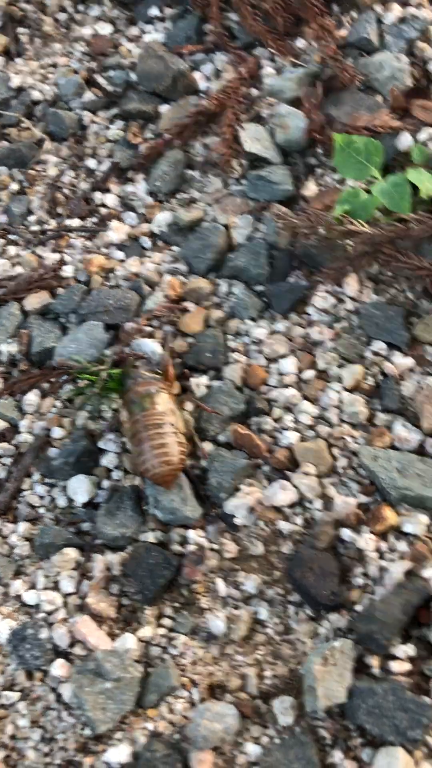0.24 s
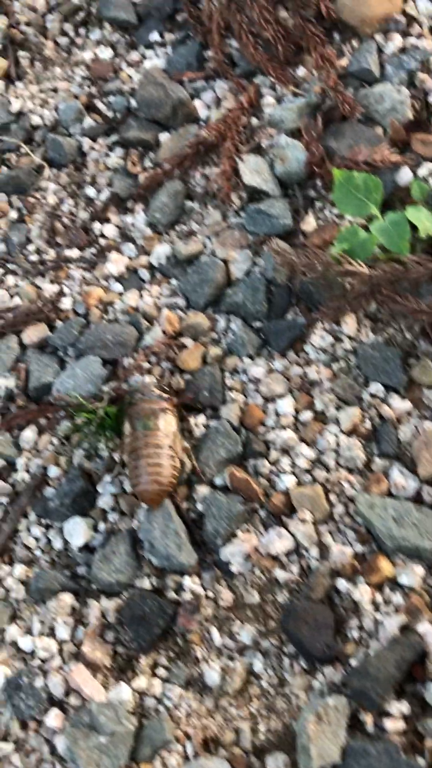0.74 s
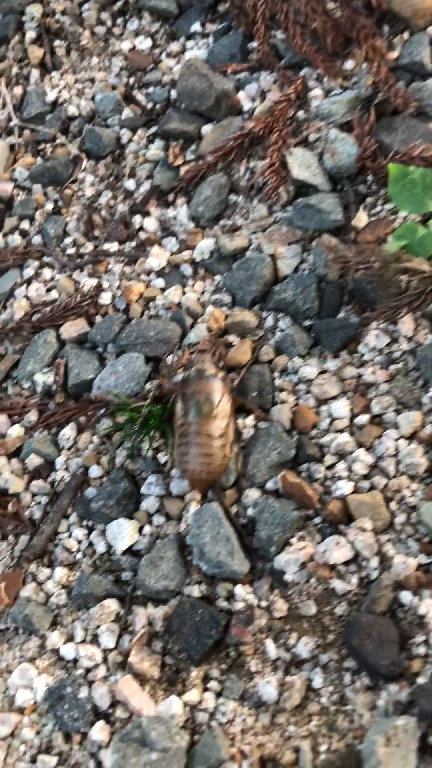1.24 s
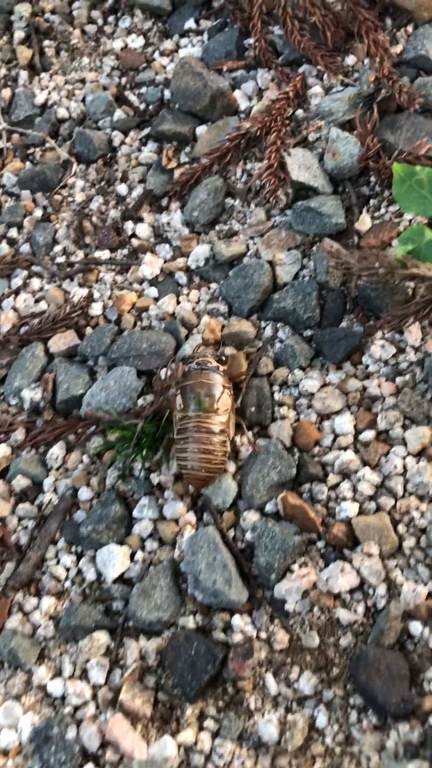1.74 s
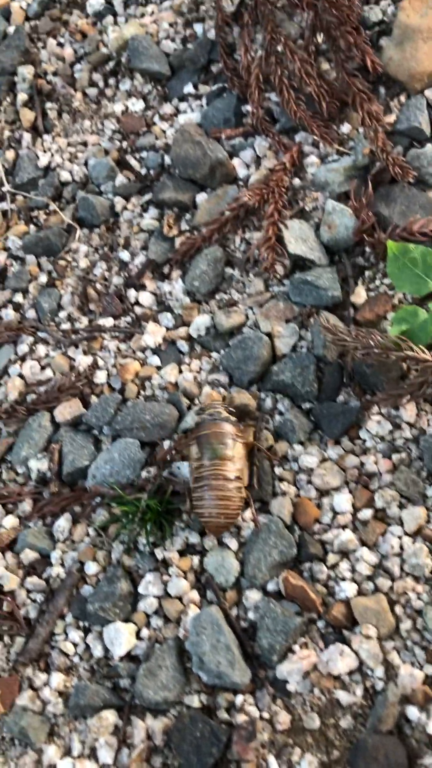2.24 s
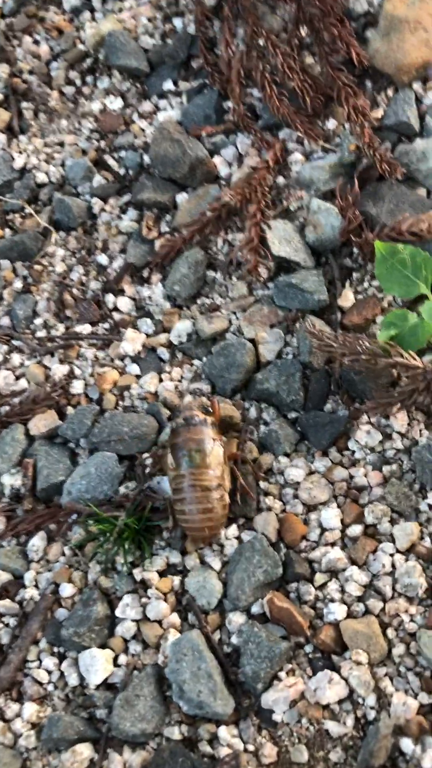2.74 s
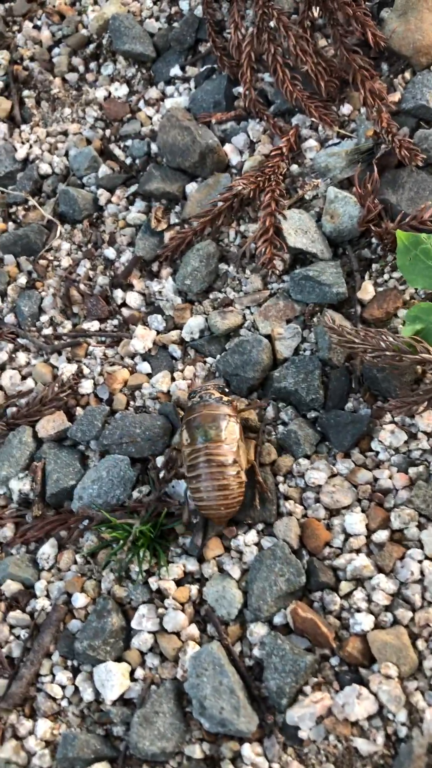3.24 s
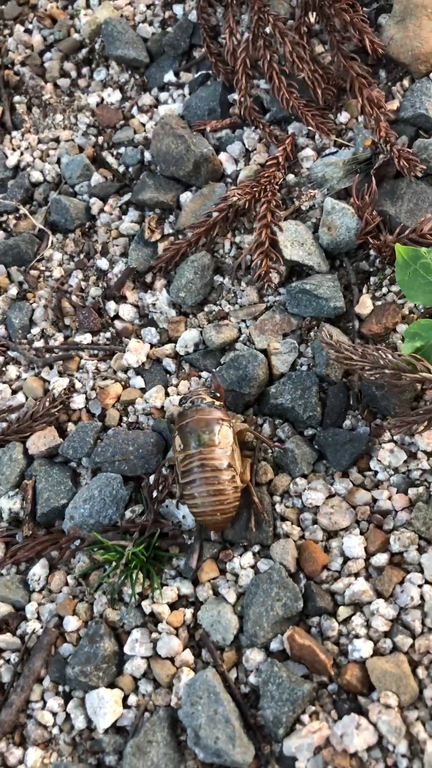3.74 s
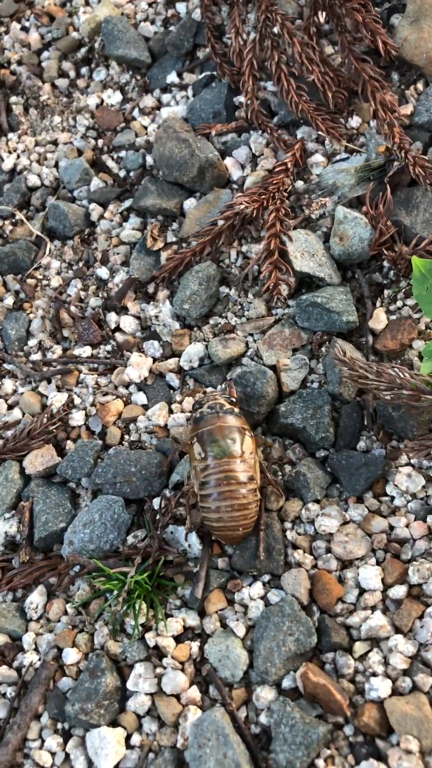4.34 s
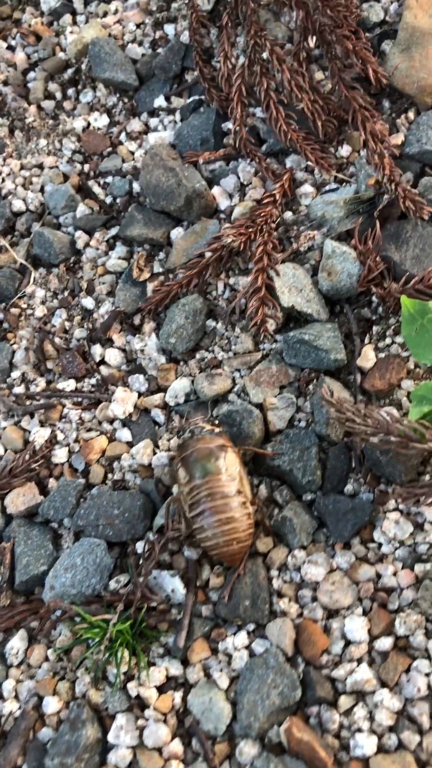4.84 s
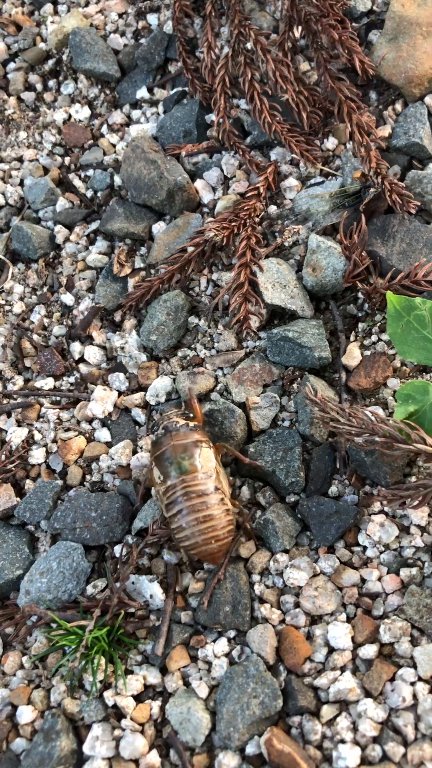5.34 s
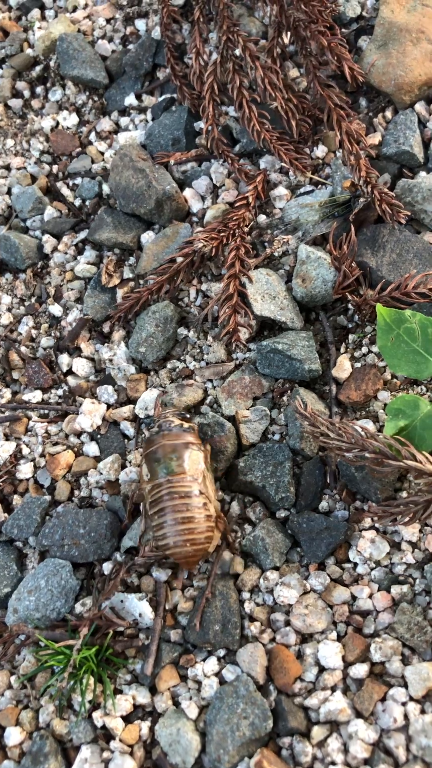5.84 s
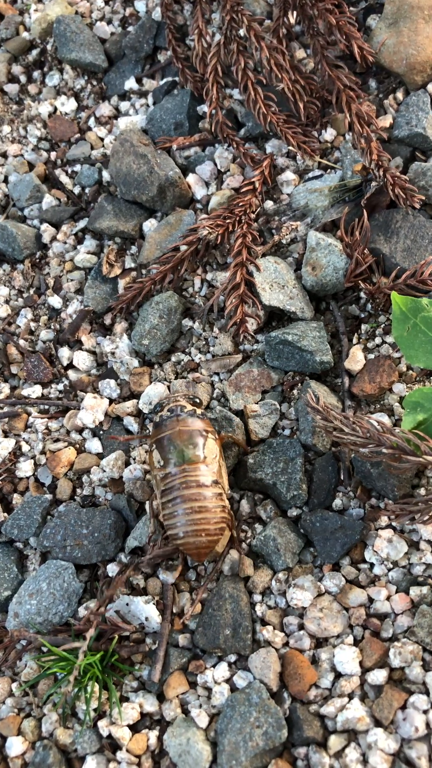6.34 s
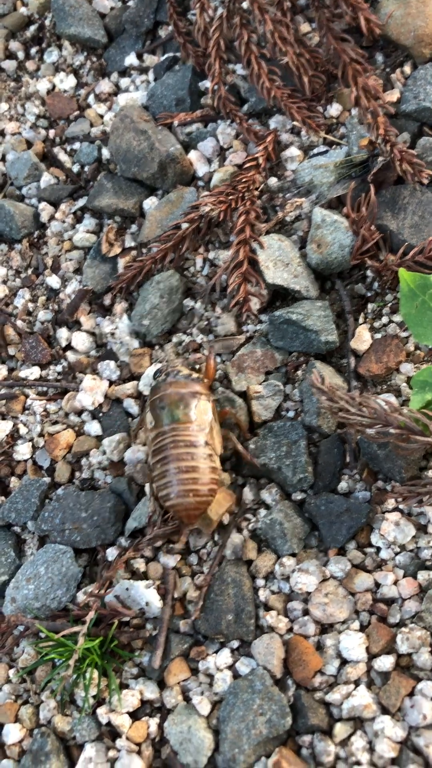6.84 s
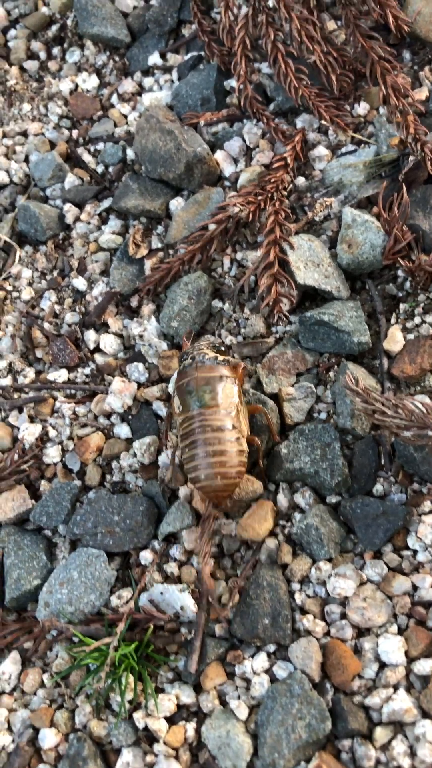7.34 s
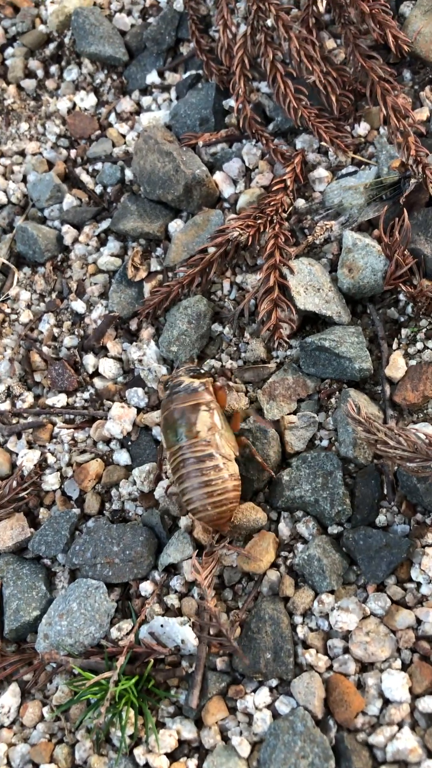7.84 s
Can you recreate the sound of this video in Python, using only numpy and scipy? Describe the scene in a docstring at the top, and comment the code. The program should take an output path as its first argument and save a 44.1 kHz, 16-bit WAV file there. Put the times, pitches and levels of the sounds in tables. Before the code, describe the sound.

Shrill cicadas throb and sizzle in the trees over a low rumble of far traffic, with faint handling noise.

```python
"""Cicadas in a park

Cicadas sing in the trees above a gravel path while a town rumbles far off. The two near ones buckle their
drum membranes about 400 times a second and throb 14 to 16 times a second, swinging between a low ring and
a high sizzle. One leads, a second winds up and takes over, and a third joins late with a slower rattle.
Two short rattles of ticks and a few soft handling rumbles sound close to the microphone."""
import sys
import numpy as np
from scipy import signal
from scipy.fft import rfft, irfft, next_fast_len
from scipy.io import wavfile

SR = 44100
rng = np.random.default_rng(int(sys.argv[2]) if len(sys.argv) > 2 else 0)


def wav_out(sig):
    """Save sig, one row per channel (or a flat mono array), as 16-bit PCM at SR to the path in sys.argv[1]."""
    wavfile.write(sys.argv[1], SR, np.round(np.clip(np.atleast_2d(sig).T, -1, 1) * 32767).astype(np.int16))


N = 357651
TIME, BINS = np.arange(N) / SR, np.fft.rfftfreq(N, 1 / SR)

# the tone of the far town: f/Hz, relative level/dB
TOWN_SPECTRUM = [(18, -34), (30, -13), (45, -3.5), (62, -9.5), (85, -4), (115, -2), (175, -1), (300, -3),
                 (400, -9.5), (540, -10.5), (680, -15.5), (1250, -16), (2000, -22), (3500, -26),
                 (6000, -37)]
# vehicles passing far off: t/s, length/s, rise of the rumble/dB, rise of the wash/dB
TRAFFIC_SWELLS = [(2.7, 0.35, 1.8, 0.9), (3.62, 0.96, 2.5, 3), (5.903, 0.43, 2, 0.5), (6.904, 1, 1.2, 2.5),
                  (7.998, 1, 2, 1)]
# handling rumbles: t/s, length/s, f/Hz, level/dB
HAND_RUMBLES = [(.21, 0.17, 74.5, -56), (0.803, 0.39, 189, -48), (2.56, 0.92, 90.5, -50.5),
                (3.855, 0.27, 152, -52), (4.1, 0.88, 72, -59), (5.75, .7, 140, -55), (5.8, 0.95, 72, -52.5),
                (6.848, 1, 48, -52.5), (7.95, 0.47, 70, -58)]
# close rattles of ticks: start/s, length/s, gain in the middle/dB
TICK_RATTLES = [(.225, .115, -38), (7.815, .075, -39.5)]
# the tones in one tick: f/Hz, relative level/dB, time to fade by 60 dB/s
TICK_TONES = [(3520, -7, 0.014), (3930, -10, 0.0091), (5350, 2, 0.02), (8640, -7, .006), (10840, 0, 0.013)]
# the tone of the distant crowd of cicadas: f/Hz, relative level/dB
CROWD_SPECTRUM = [(3000, -45), (3900, -21), (4450, -8), (5200, -0.5), (5800, 0), (6600, -2.5), (7600, -3.5),
                  (8550, -1.5), (9400, -9), (10600, -10), (12000, -7.5), (14400, -6), (15700, -9.5)]
# how loud the crowd is: t/s, level/dB
CROWD_LEVEL = [(0, -41), (1.5, -40.5), (2.5, -40), (3.7, -39.5), (5, -39.5), (6, -40.5), (8.1, -40.5)]
# thin whistles in the chorus: t/s, length/s, f/Hz, glide/(Hz per s), level/dB
CHORUS_WHISTLES = [(.2, 1.6, 5748, 0, -54), (.3, 1.5, 6785, 30, -57), (1.9, 4.5, 7265, 40, -58.5),
                   (2.7, 1.3, 5350, -10, -53), (4.4, .8, 10885, 30, -60), (5.5, 1.8, 8515, 0, -60.5),
                   (5.6, 3.6, 2299, 3, -67.5)]
# the tone of the late cicada: f/Hz, relative level/dB
LATE_SPECTRUM = [(3300, -46), (4200, -3.5), (5300, -12), (6400, 2), (7400, 4.5), (9400, -20), (10600, -3.5),
                 (12500, -0.5), (14500, 0), (15700, -9)]
# how loud the late cicada is: t/s, level/dB
LATE_LEVEL = [(6.05, -80), (6.22, -43), (6.8, -42), (7.4, -43.5), (8.1, -44.5)]
# resonances of a cicada's hollow abdomen: f/Hz, width/Hz, relative level/dB, moment in the throb (0-1)
ABDOMEN_RESONANCES = [(5350, 700, -7, .45), (5800, 850, 0, .42), (6230, 700, -6.5, .48),
                      (8150, 820, -11, .05)]
# the first cicada throbs a little faster over time: t/s, throb rate/Hz
FIRST_THROB_RATE = [(0, 15.07), (2.9, 15.72)]
# the first cicada fades: t/s, ring level/dB, sizzle level/dB
FIRST_LEVELS = [(0, -49.5, -53), (.8, -50, -50), (1.5, -46.5, -54), (2.5, -48, -50), (3.3, -60, -58),
                (4, -70, -68)]
# the second cicada winds up: t/s, click rate/Hz
SECOND_CLICK_RATE = [(0, 260), (1.6, 278), (2.2, 306), (2.8, 345), (3.1, 361), (3.5, 373), (4, 380.5),
                     (5, 385), (5.9, 386.5), (6.6, 384), (8.1, 384.5)]
# its throbbing slows and settles: t/s, throb rate/Hz
SECOND_THROB_RATE = [(3.7, 15.97), (4.3, 14.66), (5.6, 13.954), (8.1, 13.838)]
# it takes over: t/s, ring level/dB, sizzle level/dB, swing of the throb/dB
SECOND_LEVELS = [(1.2, -56, -68, -2.5), (2.4, -49, -59, -1.5), (3.5, -46, -52, -0.5), (4.5, -45.5, -50, 2),
                 (5.3, -46, -46, 4), (6, -44, -44.5, 4.5), (7.1, -42.5, -44, 5), (8.1, -43.5, -43, 2)]
# its sizzle climbs: t/s, centre f/Hz
SECOND_SIZZLE_PITCH = [(4.5, 14100), (5.3, 14250), (6, 14600), (6.6, 14950), (7.3, 15400), (8.1, 15200)]
# it tightens its abdomen: t/s, factor on the resonance frequencies
SECOND_TENSION = [(1.2, .96), (2.4, .995), (6.1, 1.003), (6.6, 1.04)]
# its rough chirp between the throbs: t/s, level/dB
CHIRP_LEVEL = [(1.2, -60), (2.4, -49.5), (3.4, -48.5), (4.4, -45), (6.1, -46.5), (6.6, -53)]
# its overtones flare up: t/s, length/s, harmonic number, relative level/dB, swing of the throb/dB
OVERTONE_FLARES = [(3.7, 1.4, 13, -51.5, 4), (4.2, .8, 16, -54, 4), (4.5, 1.4, 15, -50, 6),
                   (5.2, 2.2, 12, -56, 4), (5.8, 1, 15, -46, 3), (7.1, 1.9, 13, -51, 3),
                   (7.15, 1.6, 14, -44.5, 1.5), (7.25, 1.7, 16, -47.5, 4)]

THROB_LIFT = .008  # a throb lifts the click rate by this share


def amp(db):
    """Turns decibels into a factor to multiply by."""
    return 10 ** (np.asarray(db) / 20)


def unit_rms(x):
    """Scales x so that its average strength (rms) is 1."""
    return x / np.sqrt(np.mean(x ** 2) + 1e-20)


def curve(rows):
    """Joins the rows of a time table with straight lines, giving one curve per value column."""
    s, *columns = np.transpose(rows)
    return np.squeeze([np.interp(TIME, s, c) for c in columns])


def swell(s, length):
    """A smooth rise to 1 and back around the time s."""
    return np.exp(-(2 * (TIME - s) / length) ** 2)


def noise():
    """White noise: an even hiss."""
    return rng.standard_normal(N)


def drift(hz):
    """A random wobble no faster than about hz, at rms 1."""
    size = next_fast_len(N)
    keep_slow = np.exp(-(np.fft.rfftfreq(size, 1 / SR) / hz) ** 2)
    return unit_rms(irfft(rfft(rng.standard_normal(size)) * keep_slow, size)[:N])


def coloured(x, spectrum):
    """Shapes the lows and highs of x by a spectrum table, at rms 1."""
    hz, db = np.transpose(spectrum)
    gain = amp(np.interp(np.log(BINS + 1), np.log(hz), db))
    return unit_rms(irfft(rfft(x) * gain, N))


def low_cut(x, hz, order):
    """Removes what lies below hz; a higher order cuts more steeply."""
    return signal.sosfilt(signal.butter(order, hz, "high", fs=SR, output="sos"), x)


def resonate(x, hz, width):
    """A resonance that lets through a band around hz: shift down, smooth twice, shift back."""
    turn = np.exp(2j * np.pi * np.cumsum(hz * np.ones(N)) / SR)
    r = np.exp(-np.pi * width / SR)
    smoothed = signal.lfilter([(1 - r) ** 2], [1, -2 * r, r * r], x / turn + 1e-18)
    return 2 * (turn * smoothed).real


def resonate_twice(x, hz, width):
    """The same resonance twice over, for steeper edges."""
    return resonate(resonate(x, hz, width), hz, width)


def trees(x, wet_db, t60):
    """Adds echoes from trunks, leaves and ground, which fade by 60 dB in t60 seconds."""
    t = TIME[:SR // 2]
    tail = rng.standard_normal(len(t)) * amp(-60 * t / t60)
    echoes = signal.oaconvolve(x, tail / np.linalg.norm(tail))[:N]
    return (x + amp(wet_db) * echoes) / np.hypot(1, amp(wet_db))


def town():
    """Far traffic: a low rumble with a hum in it and a wash of noise above, swelling as vehicles pass."""
    rise_db = 0.1445 * TIME
    rumble_db = -51.5 + rise_db + sum(db * swell(s, length) for s, length, db, _ in TRAFFIC_SWELLS)
    passing_db = sum(db * swell(s, length) for s, length, _, db in TRAFFIC_SWELLS)
    air = coloured(noise(), TOWN_SPECTRUM)
    rumble = signal.sosfiltfilt(signal.butter(3, 420, fs=SR, output="sos"), air)
    wash = unit_rms(air - rumble) * amp(-55.5 + rise_db + passing_db)
    tyres = unit_rms(resonate(noise(), hz=600, width=500)) * amp(-59.5) * passing_db / passing_db.max()
    hum = unit_rms(resonate(noise(), hz=174.2, width=23.6)) * amp(-58.5)
    return unit_rms(rumble) * amp(rumble_db) + wash + tyres + hum


def handling():
    """A hand shifts on the camera body: soft swells of low noise."""
    return sum(amp(db) * unit_rms(resonate(noise(), hz, width=0.58 * hz)) * swell(s, length)
               for s, length, hz, db in HAND_RUMBLES)


def ticks(gap_s=.008, ends_db=-6, spread_db=0.5):
    """Dry ticks ring briefly, never twice alike, and run together into a rasp that is softer at its ends."""
    out, t = np.zeros(N), TIME[:SR // 40]
    for start, length, gain_db in TICK_RATTLES:
        for s in np.arange(0, length, gap_s):
            tick = sum(amp(db - 60 * t / t60) * np.sin(2 * np.pi * hz * rng.uniform(.97, 1.03) * t)
                       for hz, db, t60 in TICK_TONES)
            level_db = gain_db + ends_db * (2 * s / length - 1) ** 2 + spread_db * rng.standard_normal()
            at = round((start + s + gap_s * rng.uniform(-.5, .5)) * SR)
            out[at:at + len(t)] += amp(level_db) * tick
    return low_cut(out, hz=2900, order=6)


def membrane(hz, rough, jitter):
    """A cicada's drum membrane buckles hz times a second: a sharp click and a short crackle of its ribs."""
    rate = hz * (1 + jitter * drift(60))
    turns = np.cumsum(rate) / SR + rng.random()
    offset = (turns % 1 - .5) * SR / rate  # samples from the nearest click
    clicks = np.sinc(offset) * np.exp(-(offset / 8) ** 2)
    crackle = noise() * np.exp(-((turns + .5) % 1) / 0.27)
    return np.sqrt(1 - rough) * unit_rms(clicks) + np.sqrt(rough) * unit_rms(crackle)


def throb_phase(rates, top_s):
    """Counts throbs; whole numbers are their tops, and one falls at the time top_s."""
    turns = np.cumsum(curve(rates)) / SR
    return turns - np.interp(top_s, TIME, turns)


def throb(phase, swing_db):
    """A level that holds, then dips by twice swing_db once a throb; a negative swing makes a bump."""
    return unit_rms(amp(-2 * swing_db * abs(np.sin(np.pi * phase)) ** 4.1))


def stroke(phase, swing_db, start=.15, rise=.2):
    """A level that jumps by twice swing_db, then dies away; start and rise are shares of a throb."""
    fall = np.interp((phase - start) % 1, [0, rise, 1], [1, 0, 1])
    return unit_rms(amp(-2 * swing_db * fall ** 1.5))


def rate_lift(phase):
    """The factor by which the click rate rises and falls with each throb."""
    return 1 + THROB_LIFT * np.cos(2 * np.pi * phase)


def crowd(count=8):
    """Distant cicadas come and go, each at its own rate, blurred by trees into the hiss of many more."""
    voices = np.zeros(N)
    for _ in range(count):
        click_hz = rng.uniform(340, 460) * (1 + .005 * drift(.5))
        clicks = membrane(click_hz, rough=0.25, jitter=0.002)
        phase = rng.uniform(12, 17) * TIME + rng.random()
        voices += clicks * throb(phase, swing_db=4.5) * amp(2.4 * drift(.8))
    chorus = unit_rms(trees(voices, wet_db=5, t60=0.4)) + amp(-3.5) * noise()
    return coloured(chorus, CROWD_SPECTRUM) * amp(curve(CROWD_LEVEL))


def whistle(s, length, hz, glide, db):
    """A faint tone swells out of the chorus, gliding and wavering in pitch and level."""
    turns = np.cumsum(hz + glide * (TIME - s) + 9.46 * drift(39.6)) / SR
    return amp(db + drift(16)) * swell(s, length) * np.sqrt(2) * np.sin(2 * np.pi * turns)


def late_cicada():
    """A third cicada starts up with a slower, coarser rattle."""
    clicks = membrane(hz=194, rough=0.8, jitter=.02)
    return coloured(trees(clicks, wet_db=3, t60=0.084), LATE_SPECTRUM) * amp(curve(LATE_LEVEL))


def abdomen(clicks, phase, swing_db, tension=1, glide=.025):
    """The abdomen rings with the clicks; its resonances slide with the throb and swell at their own times."""
    stretch = tension * (1 + glide * np.sin(2 * np.pi * phase))
    ring = sum(amp(db) * resonate(clicks, hz * stretch, width) * throb(phase - moment, swing_db)
               for hz, width, db, moment in ABDOMEN_RESONANCES)
    return unit_rms(low_cut(ring, hz=4650, order=10))


def sizzle(clicks, phase, centre_hz, swing_db, sweep_hz=1500):
    """The high ring of the ribs sweeps upward through each throb; nearby leaves smear its clicks."""
    hz = centre_hz + sweep_hz * ((phase + .5) % 1 - .5)
    core = resonate_twice(clicks + .5 * noise(), hz, width=2600)
    core = unit_rms(trees(core, wet_db=3, t60=.04)) * unit_rms(amp(swing_db * np.cos(2 * np.pi * phase)))
    # a lower, broader band swells just before the core
    fringe = resonate_twice(clicks, hz - 900, width=3400)
    fringe = unit_rms(trees(fringe, wet_db=24, t60=0.054)) * throb(phase + .13, swing_db)
    wavering = unit_rms(core + amp(-5) * fringe) * amp(.6 * drift(6))
    return trees(wavering, wet_db=-14, t60=.19)


def first_cicada():
    """A near cicada in full, hoarse song at a nearly steady click rate, dying away."""
    phase = throb_phase(FIRST_THROB_RATE, top_s=.005)
    ring_db, sizzle_db = curve(FIRST_LEVELS)
    clicks = membrane(414.7 * rate_lift(phase), rough=0.31, jitter=0.0029)
    ring = trees(abdomen(clicks, phase, swing_db=7) * amp(ring_db), wet_db=7, t60=0.09)
    return ring + sizzle(clicks, phase, centre_hz=15400, swing_db=5.5) * amp(sizzle_db)


def chirp(clicks, phase, swing_db, hz=4880):
    """The deepest resonance of the second cicada's abdomen sounds between the throbs."""
    ring = resonate_twice(clicks + 0.22 * noise(), hz * curve(SECOND_TENSION), width=650)
    return unit_rms(ring) * stroke(phase, 1.6 * swing_db) * amp(curve(CHIRP_LEVEL))


def overtones(phase, ring_db):
    """The second cicada's clean overtones sound at the slow end of each throb, so their pitch holds level."""
    slow_hz = curve(SECOND_CLICK_RATE) * (1 - THROB_LIFT) * (1 + .0007 * drift(25))
    turns = np.cumsum(slow_hz) / SR
    harmonics = {k: np.sin(2 * np.pi * k * turns) * amp(drift(25)) for k in range(12, 17)}
    fade_in = np.interp(TIME, [2, 3], [0, 1])
    steady = (harmonics[13] + harmonics[15]) * amp(ring_db - 11.5) * fade_in * stroke(phase, swing_db=6.5)
    flares = sum(harmonics[k] * amp(db) * swell(s, length) * stroke(phase, swing_db)
                 for s, length, k, db, swing_db in OVERTONE_FLARES)
    return steady + amp(-1) * flares


def second_cicada():
    """Another near cicada winds up; once up to speed it throbs deeply and its sizzle grows and climbs."""
    phase = throb_phase(SECOND_THROB_RATE, top_s=3.726)
    ring_db, sizzle_db, swing_db = curve(SECOND_LEVELS)
    clicks = membrane(curve(SECOND_CLICK_RATE) * rate_lift(phase), rough=0.24, jitter=0.001983)
    ring = abdomen(clicks, phase, swing_db, curve(SECOND_TENSION)) * amp(ring_db)
    ring = trees(ring, wet_db=-3, t60=.08)
    high = sizzle(clicks, phase, curve(SECOND_SIZZLE_PITCH), swing_db=5 + .65 * swing_db) * amp(sizzle_db)
    return ring + high + chirp(clicks, phase, swing_db) + overtones(phase, ring_db)


def scene():
    """Everything reaches one microphone, alike in both channels."""
    insects = first_cicada() + second_cicada() + crowd() + late_cicada()
    insects += sum(whistle(*row) for row in CHORUS_WHISTLES)
    mono = insects + town() + handling() + trees(ticks(), wet_db=-6, t60=0.2)
    return np.array([mono, mono])


def record(dry, top_hz=15780):
    """The microphone loses the deepest bass, and the recorder cuts the highest treble."""
    thinned = low_cut(dry, hz=35, order=6)
    treble_cut = signal.firwin(801, top_hz, window=("kaiser", 9), fs=SR)
    return signal.oaconvolve(thinned, treble_cut[None], "same")


dry = scene()
out = record(dry)
wav_out(out)
```